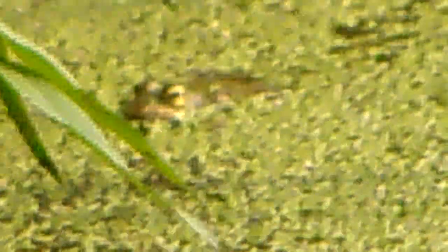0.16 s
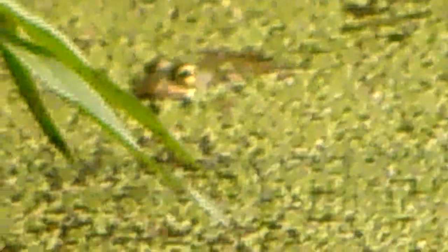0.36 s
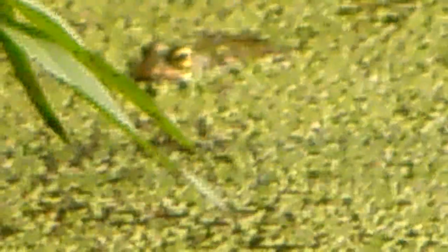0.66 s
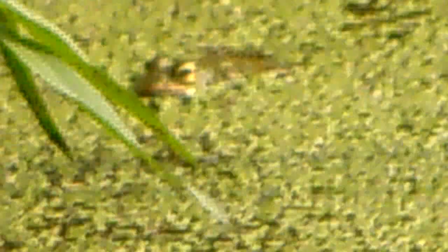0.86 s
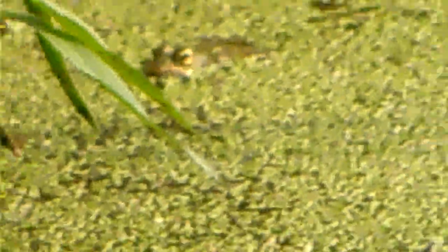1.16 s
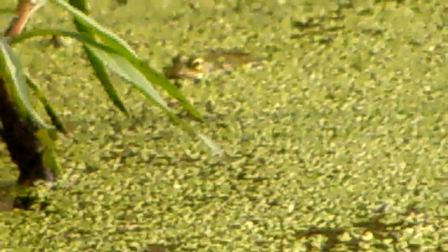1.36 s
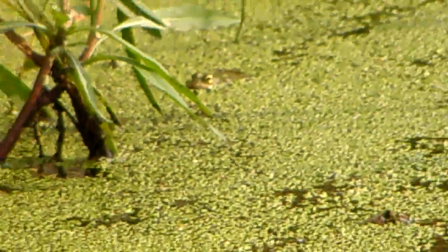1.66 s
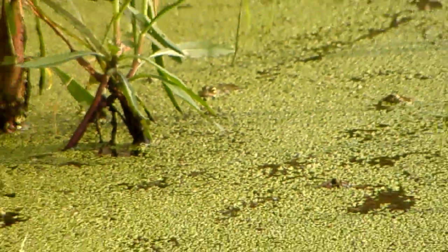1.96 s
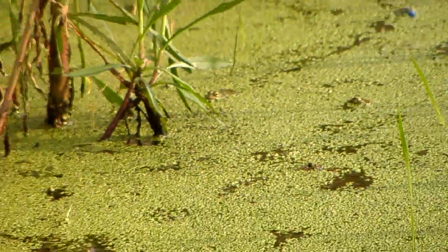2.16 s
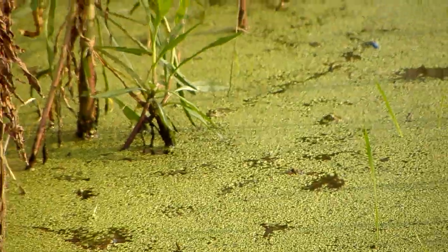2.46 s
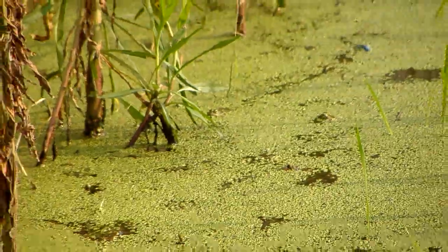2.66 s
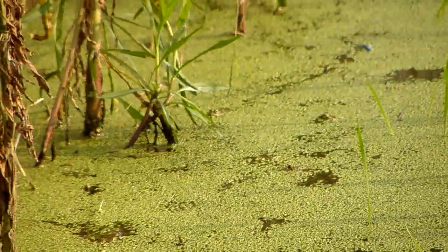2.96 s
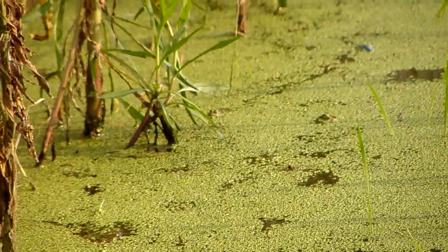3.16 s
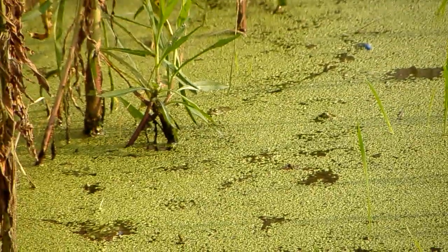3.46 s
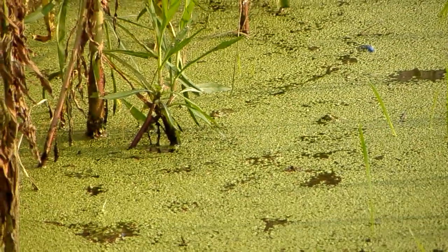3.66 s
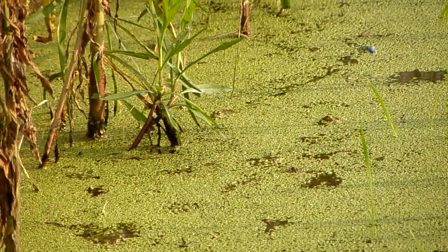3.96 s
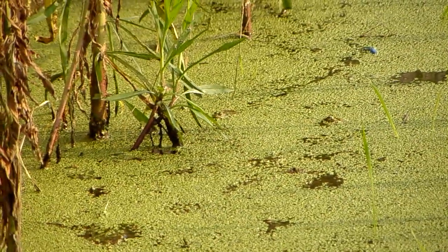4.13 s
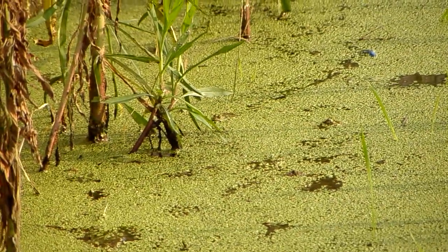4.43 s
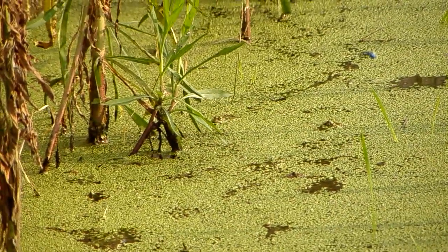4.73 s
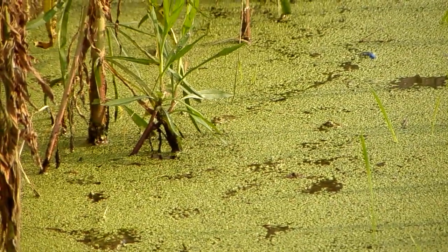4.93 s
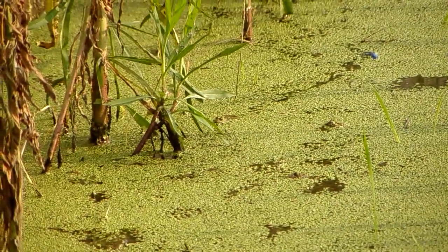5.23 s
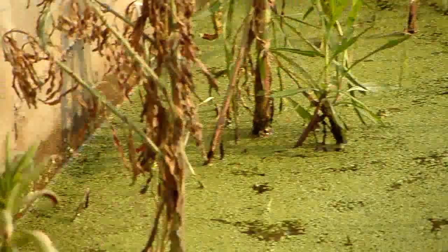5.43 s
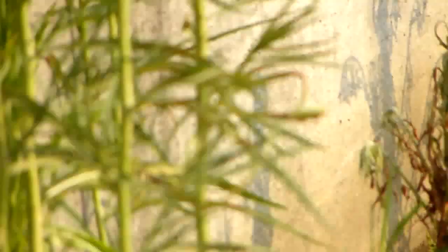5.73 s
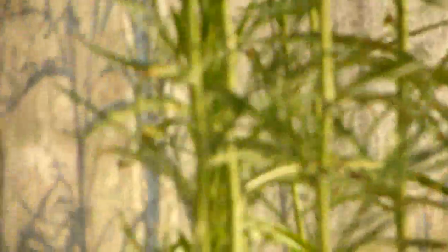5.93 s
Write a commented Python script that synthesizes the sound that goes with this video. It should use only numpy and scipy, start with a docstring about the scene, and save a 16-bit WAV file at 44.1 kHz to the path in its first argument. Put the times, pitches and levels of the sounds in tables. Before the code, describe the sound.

Two quick, bright frog trills, made of pulsed, clicking notes, stand out late against a very quiet pond background. Before them come a lower, duller four-note croak right at the start and a single faint note. A far frog chorus murmurs and dies away, soft wind puffs drop off midway, and a small camera tick with a dull thump precedes a barely audible zoom whine. Open air, stereo built-in microphone, with short scattered reflections and a faint tail.

```python
"""A weedy pond where frogs call: a low four-note croak, one soft note, then two bright trills.
Each note is a slowing run of clicks that excites the resonances of body and vocal sac; a trill tightens the sac.
Reeds and banks scatter the calls. A far chorus of throbbing noise fades over a low rumble and a light breeze
of filtered noise; faint husky tones fall in pitch, and a camera ticks and whines as it zooms."""
import sys
import numpy as np
from scipy import signal
from scipy.fft import rfft, irfft
from scipy.io import wavfile
from scipy.ndimage import uniform_filter1d

SR = 44100
rng = np.random.default_rng(int(sys.argv[2]) if len(sys.argv) > 2 else 0)


def pcm_store(signal):
    """Save signal as 16-bit PCM."""
    levels = np.round(np.clip(np.atleast_2d(signal), -1, 1) * 32767)
    wavfile.write(sys.argv[1], SR, levels.astype(np.int16).T)


N = 268524


def gain_of(db):
    """Level law: 20 dB is a factor of ten in amplitude."""
    return 10 ** (np.asarray(db) / 20)


def evened(x):
    """Normalisation: scales the mean power, and so the rms, to 1."""
    return x / np.sqrt(np.mean(x ** 2) + 1e-20)


def read(points, hz):
    """Interpolation along a logarithmic frequency axis."""
    f, value = np.transpose(points)
    return np.interp(np.log(hz + 1), np.log(f + 1), value)


def add(mix, s, sound):
    """Superposition: adds a sound to the mix at time s."""
    start = round(s * SR)
    sound = sound[max(-start, 0):]
    part = mix[max(start, 0):][:len(sound)]
    part += sound[:len(part)]


def bins(size=N):
    """Discrete Fourier analysis: the frequencies of a spectrum, in Hz."""
    return np.fft.rfftfreq(size, 1 / SR)


def filtered(x, gain):
    """Linear filtering: multiplies the spectrum by a gain."""
    return irfft(rfft(x) * gain, N)


def coloured(x, spectrum):
    """Spectral shaping: filters a sound by a dB curve, at an rms of 1."""
    return evened(filtered(x, gain_of(read(spectrum, bins()))))


def drift(rate):
    """Low-passed noise: a slow random fluctuation with an rms of 1."""
    return evened(filtered(rng.standard_normal(N), np.exp(-(bins() / rate) ** 2)))


def trills():
    """Tension raises resonance: as the sac tightens, notes get higher and brighter and falter inside."""
    # notes of the two trills: t/s, length/s, clicks, level/dB, change over the note/dB
    trill_notes = [ (3.6112, 0.023, 6, -36, 1.5), (3.6812, .0228, 8, -23, -6.5),
                   (3.75, 0.026, 8, -23.5, -1.5), (3.8245, 0.023, 7, -22.5, -2.5),
                   (3.8977, 0.023, 7, -23.5, -2), (3.9708, 0.024, 7, -21.5, -7),
                   (4.0415, 0.032, 8, -23.5, -14), (4.2284, 0.024, 6, -33.5, 0.5),
                   (4.292, 0.025, 7, -30, 2.5), (4.3609, .026, 7, -22.5, -4.5),
                   (4.4312, 0.024, 7, -19.5, -7.5), (4.5029, 0.031, 8, -20, -4),
                   (4.5769, 0.022, 7, -19.5, -5.5), (4.6463, 0.022, 7, -23, -4.5)]
    tighten_s = 0.32  # the sac is tightest this long after the trill starts
    sac_hz_range, bright_db_range = (1830, 2527), (-9.5, -1.7)  # (slack, tight)
    ring_start_hz, ring_fall_hz_per_s = 7390, 3240  # the upper ring falls throughout
    # place and width of the falter are shares of the note
    falter_db, falter_at, falter_earlier_per_s, falter_width = -7, .68, 0.85, 0.08
    notes = []
    for (s, length, clicks, level_db, fade_db), age in zip(trill_notes, ages(trill_notes)):
        places = click_places(length, clicks)
        tight = np.sin(np.pi / 2 * age / tighten_s)
        sac_hz, bright_db = (slack + tight * (taut - slack) for slack, taut in (sac_hz_range, bright_db_range))
        from_falter = places - falter_at + falter_earlier_per_s * age
        falter = tight * np.exp(-(from_falter / falter_width) ** 2)
        shape_db = fade_db * places + falter_db * falter
        ring_hz = ring_start_hz - ring_fall_hz_per_s * age
        notes.append((s, length, level_db, places, shape_db, sac_hz, bright_db, ring_hz))
    return notes


def low_croak():
    """Sinking resonances: both fall as the croak goes on, and weaker excitation dulls the soft notes."""
    # the low croak and the soft lone note: t/s, length/s, clicks, level/dB, change over the note/dB
    low_notes = [(-.0095, 0.025, 7, -33.5, -1.5), (0.056, 0.021, 7, -32, -2), (.116, .0283, 8, -31.5, -2),
                 (0.177, 0.032, 8, -31.5, -1.5), (0.753, .0295, 5, -42, 0.5)]
    first_sac_hz, first_ring_hz, sink_per_s = 1634, 4260, 0.36
    loudest_bright_db = -4
    dulling = 0.66  # dB of brightness lost per dB under the loudest note
    notes, loudest_db = [], max(row[3] for row in low_notes)
    for (s, length, clicks, level_db, fade_db), age in zip(low_notes, ages(low_notes)):
        places = click_places(length, clicks)
        sunk = 1 - sink_per_s * age
        bright_db = loudest_bright_db - dulling * (loudest_db - level_db)
        notes.append((s, length, level_db, places, fade_db * places,
                      first_sac_hz * sunk, bright_db, first_ring_hz * sunk))
    return notes


def click_places(length, clicks):
    """Relaxation: clicks, as shares of the note, lag as the air runs out. A faint one leads in."""
    drag_s, drag_clicks = .0235, 1.37  # note length whose last gap is about twice its first; build-up of the lag
    k = np.arange(round(clicks))
    gaps = 1 + (length / drag_s) ** 2 * np.exp((k - k[-1]) / drag_clicks)
    return (np.append(0, np.cumsum(gaps)) - gaps[0]) / gaps[1:].sum()


def ages(notes):
    """Grouping in time: how long the call has been going at each note, in s."""
    pause_s = .12  # a longer wait between notes starts a new call
    starts = np.array([row[0] for row in notes])
    opens_call = np.diff(starts, prepend=-np.inf) > pause_s
    return starts - np.maximum.accumulate(np.where(opens_call, starts, -np.inf))


def ringing(db, size=2048):
    """Minimum phase: the causal click response with this dB gain, by folding the cepstrum."""
    cepstrum = irfft(db * np.log(10) / 20)
    cepstrum[1:size // 2] *= 2
    cepstrum[size // 2 + 1:] = 0
    return irfft(np.exp(rfft(cepstrum)))


def peak(f, hz, width, height_db, edge_db):
    """Resonance: a Lorentzian peak, in dB, with a step down just above it."""
    edge = .5 + .5 * np.tanh(2 * (f - hz - width / 2) / width)
    power = 1 + gain_of(height_db) ** 2 / (1 + (2 * (f - hz) / width) ** 2)
    return 10 * np.log10(power) + edge_db * edge


def frog(notes, body, onset_db, attack_s, sac_width, sac_db, sac_edge_db, ring_width, ring_db, ring_edge_db,
         sac_sag, ring_sag, spread_ms, rasp_db, uneven_db, patchy_db, size=2048):
    """Source and filter: slowing clicks ring the body, the sac and one upper resonance, over a rasp."""
    # how brightness acts on each band: f/Hz, share
    effort = [(570, -0.98), (1400, -0.014), (2400, -0.28), (3800, 0.54), (6000, 0.97)]
    out, f = np.zeros(N), bins(size=size)
    # each click is a tiny downward chirp: its treble comes first
    delay_s = spread_ms / 1e3 * np.exp(-f / 2500)
    chirp = np.exp(-2j * np.pi * np.cumsum(delay_s) * f[1])
    for s, length, level_db, places, shape_db, sac_hz, bright_db, ring_hz in notes:
        chance = rng.uniform(-1, 1, (len(places), 3))
        onset = np.exp(-places * length / attack_s)
        sizes_db = level_db + shape_db + onset_db * onset + uneven_db * chance[:, 0]
        colour_db = read(body, f) + bright_db * read(effort, f)
        # a duller note also rings less
        tight_db, upper_db = sac_db + 0.47 * bright_db, ring_db + 0.9 * bright_db
        for place, size_db, (_, detune, late) in zip(places, sizes_db, chance):
            slack = place - .5 + 0.4 * detune  # both resonances sink through the note
            # no two clicks have quite the same colour, least of all in the treble
            rough = uniform_filter1d(rng.standard_normal(len(f)), size=22)
            patches = evened(uniform_filter1d(rough, size=14))
            click = ringing(colour_db + patchy_db * patches * np.minimum(f / 4000, 1)
                            + peak(f, sac_hz * (1 - sac_sag * slack), sac_width, tight_db, sac_edge_db)
                            + peak(f, ring_hz * (1 - ring_sag * slack), ring_width, upper_db, ring_edge_db))
            click = irfft(rfft(click) * chirp)
            click *= np.sqrt(SR * 0.0045) / np.linalg.norm(click)
            add(out, s + place * length + .00025 * late, gain_of(size_db) * click)
            # air hisses through around each click, most at the start of the note
            puff = np.diff(rng.standard_normal(size // 8 + 1)) * np.hanning(size // 8) / np.sqrt(size // 8)
            rasp = gain_of(level_db + rasp_db - 5.9 * place) * signal.fftconvolve(puff, click)
            add(out, s + place * length - .003, rasp)
    return out


def ports(x, side, lead):
    """Interaural cues: two microphone ports differ in level (dB) and phase (radians)."""
    half = gain_of(read(side, bins()) / 2) * np.exp(.5j * lead)
    return filtered(x, np.array([half, 1 / half]))


def echoes(x, t60, delay, colour, same):
    """Exponential reverberant decay: scattered reflections, partly alike in both ears."""
    t = np.arange(N) / SR
    noise = rng.standard_normal((3, N))
    scattered = rng.random((3, N)) < 4000 / SR  # about 4000 reflections a second
    taps = noise * scattered * gain_of(-60 * t / t60) * (t > delay)
    taps = np.sqrt(same) * taps[0] + np.sqrt(1 - same) * taps[1:]
    taps = filtered(taps / np.linalg.norm(taps[0]), gain_of(read(colour, bins())))[:, :2 * SR]
    return signal.fftconvolve(x[None], taps, axes=1)[:, :N]


def husky_tones(width_hz=380):
    """Modulated tones: short faint tones fall in pitch, made husky by narrow-band noise."""
    # faint husky tones, falling in pitch: t/s, length/s, f/Hz at the middle, level/dB
    tones = [(0.673, 0.061, 4100, -71), (1.08, 0.045, 4130, -70), (1.09, 0.06, 3230, -65.5),
             (1.837, .07, 3650, -78), (3.163, 0.069, 4640, -77), (5.34, .07, 3400, -82)]
    out = np.zeros(N)
    for s, length, hz, db in tones:
        u = np.linspace(0, 1, round(length * SR))
        pitch = hz * (1 - 0.098 * (u - .5))
        tone = np.sin(2 * np.pi * np.cumsum(pitch) / SR)
        add(out, s, gain_of(db) * evened(tone * drift(width_hz)[:len(u)] * np.sin(np.pi * u)))
    return out


def camera(whine_hz=6280, whine_db=-82, thump_hz=48):
    """Impulsive excitation: decaying ticks with a soft thump of the housing; the zoom motor whines briefly."""
    # camera ticks: t/s, tick level/dB, thump level/dB
    ticks = [(0.813, -54, -59), (2.193, -51, -47)]
    out, t = np.zeros(N), np.arange(SR // 20) / SR
    for s, tick_db, thump_db in ticks:
        add(out, s, gain_of(tick_db) * rng.standard_normal(len(t)) * np.exp(-t / 0.0022))
        add(out, s - .025, gain_of(thump_db) * np.sin(2 * np.pi * thump_hz * t) * np.hanning(len(t)))
    t = np.arange(round(.3 * SR)) / SR
    whine = np.sin(2 * np.pi * whine_hz * t) * signal.windows.tukey(len(t), .2)
    add(out, 2.29, gain_of(whine_db) * whine)
    return out


def chorus(count=12, lead_s=.00004):
    """Incoherent summation: far frogs are noise, each throbbing at its own wandering note rate."""
    # chorus spectrum: f/Hz, level/dB
    chorus_spectrum = [(300, -11.5), (550, -2.5), (850, -8), (1130, 2), (1280, -4.5), (1420, 1),
                       (1550, 0.5), (1750, 2.5), (1900, 1), (2080, -0.5), (2400, -11.5), (3200, -19.5),
                       (6000, -34.5)]
    # the chorus dies away: t/s, level/dB
    chorus_fade = [(0, -51.5), (3, -59), (6.1, -87)]
    t = np.arange(N) / SR
    voices = np.zeros(N)
    for note_hz in rng.uniform(9, 18, count):
        cycles = note_hz * t + rng.random() + .5 * drift(1.83)
        throb = (.5 + .5 * np.cos(2 * np.pi * cycles)) ** 2
        voices += (0.49 + throb) * gain_of(0.43 * drift(0.95)) * rng.standard_normal(N)
    pair = ports(evened(voices), [(1000, 0)], 2 * np.pi * bins() * lead_s)
    pair = pair + .25 * rng.standard_normal((2, N))  # blurs the direction
    return gain_of(np.interp(t, *np.transpose(chorus_fade))) * coloured(pair, chorus_spectrum)


def breeze():
    """Turbulent pressure: random low puffs push on the two ports unequally, mostly in antiphase."""
    # breeze spectrum: f/Hz, level/dB
    breeze_spectrum = [(20, -32), (55, -16), (90, 2.5), (140, 8), (200, -11.5), (300, -10), (700, -33),
                       (2000, -53), (8000, -74)]
    # the breeze drops around halfway: t/s, level/dB
    breeze_level = [(0, -56), (2.7, -58.5), (3.6, -70.5)]
    gust_db, gusts_hz = 5.5, 5
    level_db = np.interp(np.arange(N) / SR, *np.transpose(breeze_level))
    force = gain_of(level_db + gust_db * drift(gusts_hz))
    mid, side = (coloured(noise, breeze_spectrum) for noise in rng.standard_normal((2, N)))
    return force * np.array([.5 * mid + side, .5 * mid - side])


def air():
    """Shaped random noise: a low outdoor rumble that swells a little, and the microphone's own hiss."""
    # rumble spectrum: f/Hz, level/dB
    rumble_spectrum = [(15, -86), (25, -38), (64, -20.5), (100, -4.5), (124, -2.5), (219, -10),
                       (454, -16.5), (562, -15.5), (603, -18.5), (662, -17), (1040, -20.5), (1190, -21.5),
                       (1620, -27), (2420, -31), (7000, -47), (9100, -79.5), (15400, -120)]
    # rumble width: f/Hz, side minus mid/dB
    rumble_width = [(60, -8.5), (110, -21), (190, -16), (350, -12), (630, -12.5), (1130, -11.5), (2030, -6),
                    (3660, 2.5), (6580, 2)]
    # microphone hiss: f/Hz, level/dB
    hiss_spectrum = [(5000, -31), (7000, -48), (9000, 9.5), (10300, 5.5), (11000, -31), (13000, -40.5)]
    mid, side = (coloured(noise, rumble_spectrum) for noise in rng.standard_normal((2, N)))
    side = filtered(side, gain_of(read(rumble_width, bins())))
    rumble = gain_of(-52.5) * np.array([mid + side, mid - side]) * gain_of(0.44 * drift(6.6))
    return rumble + gain_of(-84.5) * coloured(rng.standard_normal((2, N)), hiss_spectrum)


def scene():
    """Superposition of fields: two frogs among reeds and banks, over the background."""
    # body response of each frog: f/Hz, level/dB
    low_body = [(200, -4), (390, -16), (520, 4), (850, 0.5), (1300, 2), (1900, -2), (2500, -7.5),
                (3000, -19), (3500, -8), (4700, -10), (5500, -24.5), (7500, -47)]
    trill_body = [(250, -30.5), (430, -14), (570, 3), (800, -16), (1050, -16.5), (1500, 5), (2100, 3.5),
                  (2650, 1.5), (2900, -6.5), (3300, 5), (4000, 0), (4550, -8), (5000, -12.5), (6000, -13),
                  (10000, -35.5)]
    # where each frog sits: f/Hz, left minus right/dB
    low_side = [(60, 3.5), (150, 4.0), (390, 1), (1010, 2.7), (2570, 2.8), (6580, 1.9)]
    trill_side = [(60, 3.0), (100, 2.0), (170, 1.5), (290, 1.5), (480, 2.5), (820, 1.6), (1370, 2.5),
                  (2320, 2), (3900, 3.0), (6580, 12)]
    # phase lead of the left port for the trills: f/Hz, lead/rad
    trill_lead = [(2000, 0.024), (2900, .2), (4000, 0.71), (6500, 0.62)]
    # what the near reeds and the far banks throw back: f/Hz, level/dB
    reeds_colour = [(500, -10), (1500, -14.5), (2500, -17), (6000, -7)]
    banks_colour = [(500, -37.5), (1800, -37.5), (2400, -29.5), (2850, -21), (3400, -31), (4200, -29.5),
                    (6000, -26.5)]
    # widths in Hz, sags as shares of the resonance
    low = frog(low_croak(), low_body, onset_db=-7, attack_s=0.0046,
               sac_width=280, sac_db=16.5, sac_edge_db=-1.5, ring_width=120, ring_db=16.5, ring_edge_db=-0.5,
               sac_sag=0.067, ring_sag=0.044, spread_ms=1.02, rasp_db=9.0, uneven_db=1.5, patchy_db=1.5)
    trill = frog(trills(), trill_body, onset_db=-7.5, attack_s=0.0025,
                 sac_width=323, sac_db=17.0, sac_edge_db=-6, ring_width=210, ring_db=11.5, ring_edge_db=-6.5,
                 sac_sag=0.028, ring_sag=0.01, spread_ms=.9, rasp_db=-4, uneven_db=2.1, patchy_db=5.0)
    direct = ports(low, low_side, 0) + ports(trill, trill_side, read(trill_lead, bins()))
    # t60 and delay in s
    reeds = echoes(low + trill, t60=0.057, delay=0.0037, colour=reeds_colour, same=0.4)
    banks = echoes(low + trill, t60=1.1, delay=0.021, colour=banks_colour, same=0.82)
    surroundings = reeds + banks + air() + breeze() + chorus() + husky_tones() + camera()
    return direct + surroundings * gain_of([[.9], [-.9]])  # leans to the left


def record(dry):
    """Transducer response: the microphone has a deep treble notch and a weak top; then the band limit."""
    # microphone response: f/Hz, gain/dB
    microphone = [(7000, 0), (7600, -10.5), (8050, -21), (8700, -1.5), (9400, -3), (10400, 1), (11000, -6),
                  (13000, -8)]
    edge_hz = 11500
    heard = filtered(dry, gain_of(read(microphone, bins())))
    low_pass = signal.firwin(511, edge_hz, window=("kaiser", 9), fs=SR)
    return signal.oaconvolve(heard, low_pass[None], "same")


dry = scene()
out = record(dry)
pcm_store(out)
```